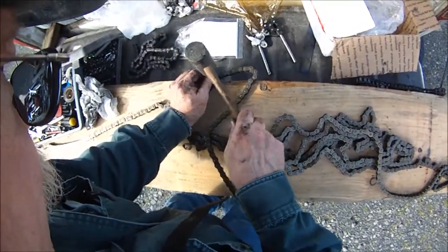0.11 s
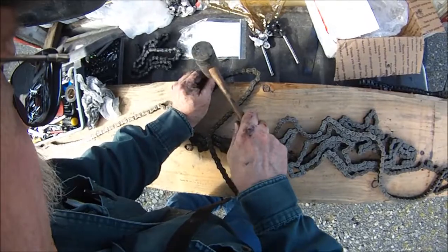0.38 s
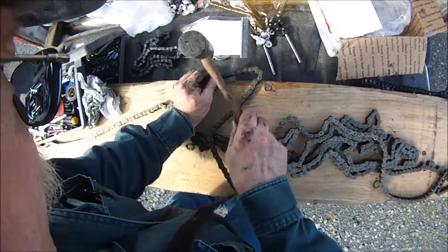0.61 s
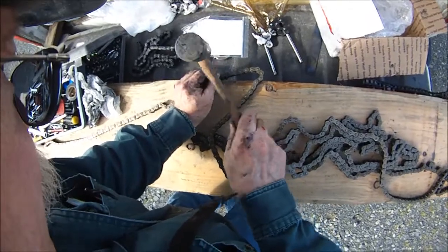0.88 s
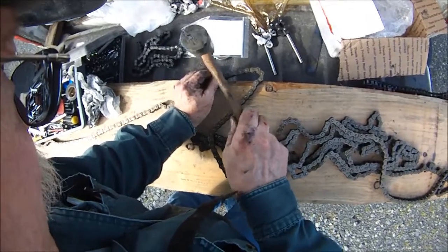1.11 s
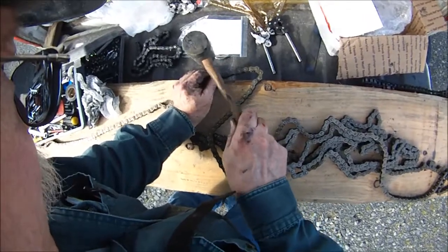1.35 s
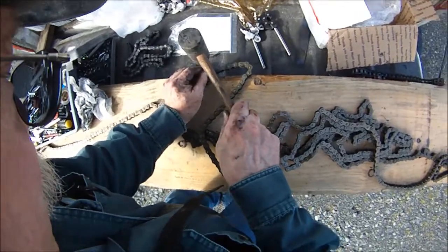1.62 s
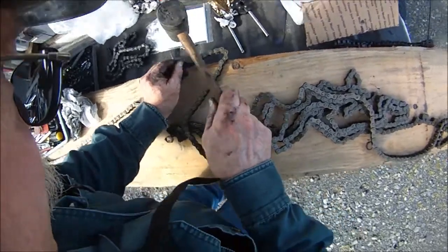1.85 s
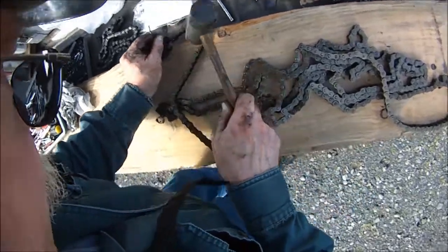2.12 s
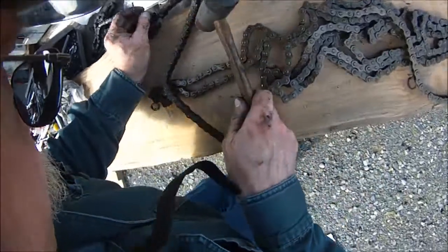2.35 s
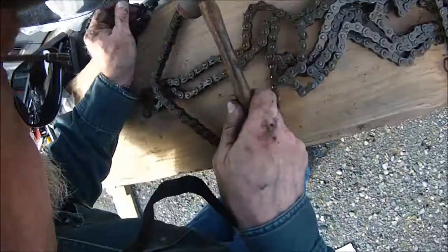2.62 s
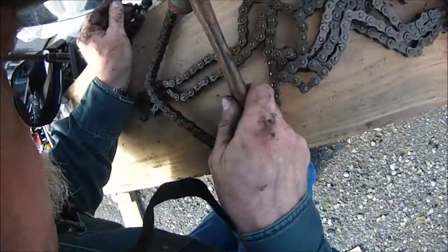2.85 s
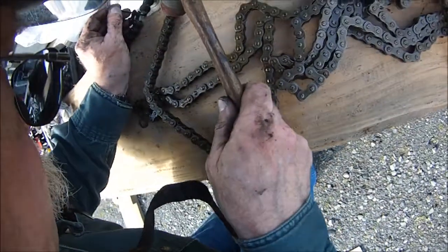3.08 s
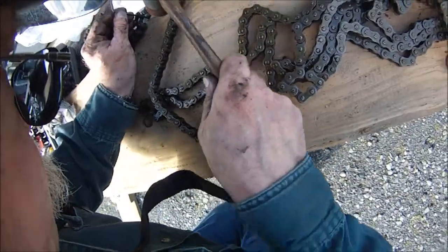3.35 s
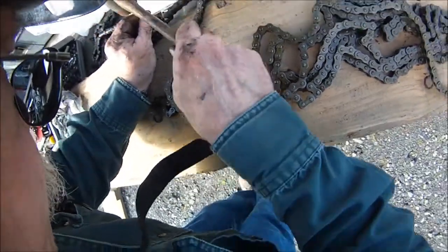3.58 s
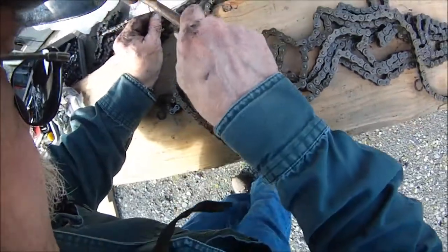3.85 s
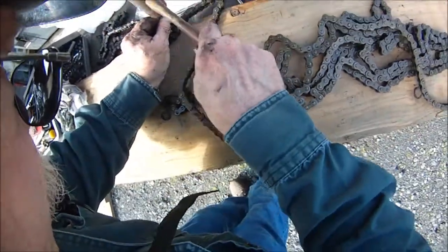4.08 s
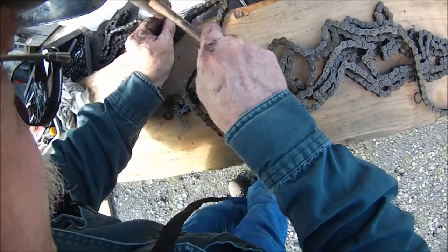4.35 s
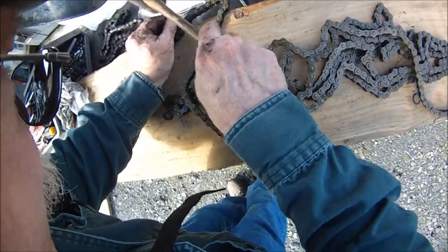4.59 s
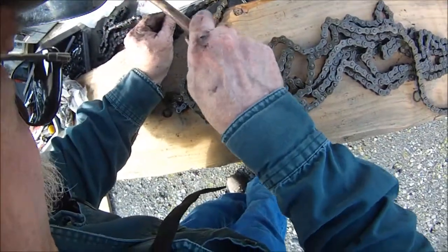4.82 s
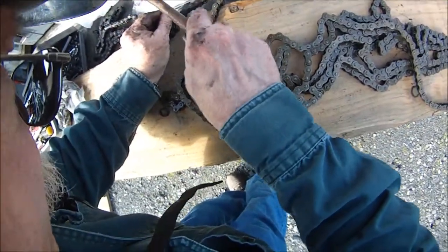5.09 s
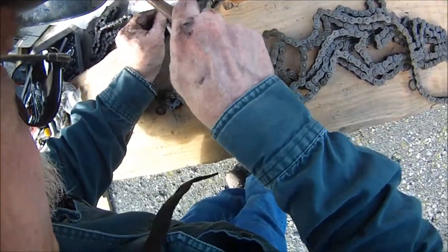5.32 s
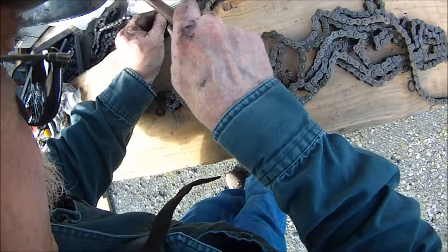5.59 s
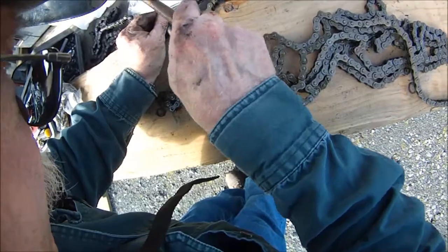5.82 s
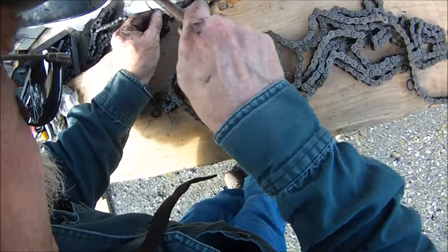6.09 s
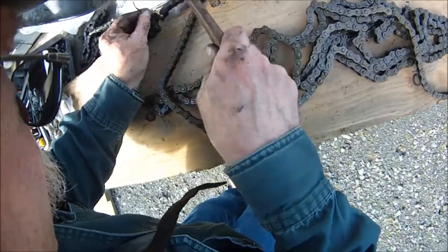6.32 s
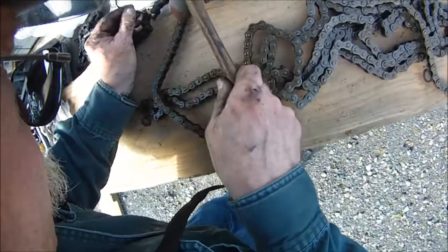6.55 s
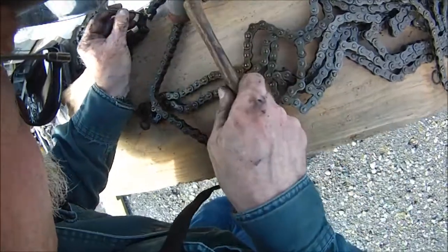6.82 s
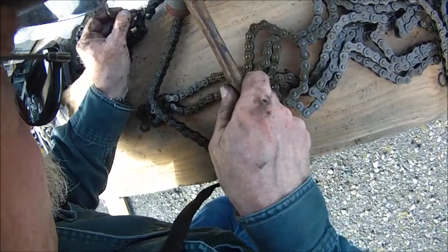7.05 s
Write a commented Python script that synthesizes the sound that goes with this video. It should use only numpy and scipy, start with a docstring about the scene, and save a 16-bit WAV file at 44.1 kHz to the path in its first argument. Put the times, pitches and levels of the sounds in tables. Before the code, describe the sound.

Close, dry hammer blows on a punch and chain link resting on a wooden plank, about four per second. Each is a hard woody knock with a steel tick, chattering rebounds, chain rattle and a short hollow boom from the metal bed below. After the first run, hands quietly shift the chain with soft bumps; then a second, slightly lighter and crisper run. Faint outdoor air and hiss remain.

```python
"""Outdoors, a small hammer taps a punch into a chain link lying on a wooden plank over a steel load bed.
Two quick runs of blows are heard. Each blow excites the damped modes of the plank, a steel tick and crack,
chain rattle and a wash of decaying noise bands from the bed; loose chain and tools hop and land as thuds,
clinks and thin ringing modes. Between the runs hands shift things: soft knocks and lumpy band noise.
A faint drifting tone and coloured noise supply the hum and the hiss."""
import sys
import numpy as np
from scipy import signal
from scipy.fft import rfft, irfft, next_fast_len
from scipy.io import wavfile
from scipy.ndimage import uniform_filter1d

SR = 44100
rng = np.random.default_rng(int(sys.argv[2]) if len(sys.argv) > 2 else 0)


def ratio_of_db(decibels):
    """Turn decibels (scalar or array-like) into linear amplitude factors; 0 dB maps to 1."""
    return 10 ** (np.asarray(decibels, float) / 20)


def store_pcm(level_fs):
    """Save levels as 16-bit WAV."""
    pcm = np.round(np.clip(level_fs, -1, 1) * 32767).astype(np.int16)
    wavfile.write(sys.argv[1], SR, np.atleast_2d(pcm).T)


N = 317079  # length in samples
LEAD = SR // 4  # samples ahead of the start, for a blow that fell just before it

# Modes of the plank. Each row: frequency in Hz, t60 in seconds before extra damping,
# relative signed swing when struck at spot 0, the same at spot 1.
PLANK = [(86.8, 0.7, 0.017, 0.008), (126.4, 0.29, 0.076, 0.018), (164.2, 0.39, 0.0266, 0.0394),
         (187.4, 0.44, 0.011, 0.012), (220, 0.029, -0.083, -0.27), (273.5, 0.32, -0.014, -0.068),
         (290.5, 0.23, -0.054, -0.027), (337.1, 0.111, 0.38, -0.24), (373.5, 0.043, -1.0, -0.196),
         (454.5, 0.16, -0.12, -0.131), (499.5, 0.14, 0.15, 0.17), (541, 0.049, -0.113, 0.58),
         (578.5, 0.068, 0.47, -0.35), (677, 0.055, 0.51, 0.66617), (734, 0.025, -0.6, -0.865),
         (818.7, 0.055, -0.102, 0.143), (946, 0.026, 0.493, 0.51), (1046.1, 0.062, -0.014, -0.13),
         (1200, 0.06, -0.093, -0.15), (1400, 0.058, -0.17892, -0.38), (1531.1, 0.21, 0.012, -0.014),
         (1740, 0.028, 0.025, 0.014), (1920, 0.083, -0.005, 0.022), (2114, 0.037, 0.057, 0.038),
         (2310, 0.021, -0.046, -0.061)]


def evened(x):
    """Normalization: scales a signal to rms 1."""
    return x / np.sqrt(np.mean(x ** 2) + 1e-20)


def add(mix, s, sound):
    """Superposition: adds a sound at s seconds to a mix that starts LEAD samples early."""
    part = mix[LEAD + round(s * SR):][:len(sound)]
    part += sound[:len(part)]


def ring(hz, db, t60, seconds):
    """Free vibration of one damped mode: a sine that decays by 60 dB in t60 seconds."""
    t = np.arange(round(seconds * SR)) / SR
    return ratio_of_db(db - 60 * t / t60) * np.sin(2 * np.pi * hz * t)


def push(x, soft_ms):
    """Contact duration: a bell-shaped force, centred 100 samples late; a softer contact is duller."""
    t_ms = np.arange(-100, 101) / SR * 1000
    force = np.exp(-(np.pi * t_ms / max(soft_ms, .05)) ** 2)
    return signal.fftconvolve(x, force / force.sum())


def band(x, hz, octaves):
    """Resonant filtering: a causal band-pass around hz."""
    edges = np.clip(hz * 2 ** (np.array([-.5, .5]) * octaves), 10, SR * .45)
    return signal.sosfilt(signal.butter(2, edges, "bandpass", fs=SR, output="sos"), x)


def blows():
    """Impact excitation: each blow drives plank, steel contact, chain and bed in proportion to its force."""
    # Each row: start in seconds, force in dB, softness of the contact in ms, first rebound in dB
    # relative to the blow, delay of the second rebound in ms, its level in dB relative to the blow.
    # The first blow fell just before the start.
    blow_rows = [(-0.12, -3, 0.6, -6, 10, -10), (0.1516, -4.5, 0.56, -13, 10.3, -5.5),
                 (0.4239, -4, 0.7, -6.1, 10, -11.8), (0.7, -2.5, 0.78, -3.8, 14.8, -13.6),
                 (0.99, -1.5, 0.7, -3.6, 13, -11.6), (1.2703, -2, 0.65, -0.7, 7.6, -7.9),
                 (1.5412, -3, 0.57, 1.5, 7.7, -9.7), (4.1025, -8, 0.93, -6.3, 13.8, -12.3),
                 (4.3773, -5, 0.88, -6.4, 9.2, -19.7), (4.6395, -5, 0.53, -12, 8.3, -9.3),
                 (4.8993, -4.5, 0.48, -22, 8, -7.5), (5.1575, -8, 0.34, -15.8, 8.2, -8.5),
                 (5.4278, -8, 0.2, -22, 8, -7.5), (5.7032, -7, 0.33, -13.4, 8.1, -7.8),
                 (5.972, -6, 0.15, -11.3, 8.2, -6.6)]
    moved_s = 3  # the link is moved from spot 0 to spot 1 of the plank
    first_rebound_ms = 4.0
    mix, t = np.zeros(N + LEAD), np.arange(SR // 2) / SR
    spots = [plank(swings, 0.81, 0.46) for swings in np.array(PLANK)[:, 2:].T]
    for s, force_db, soft_ms, rebound_db, second_ms, second_db in blow_rows:
        spot = int(s > moved_s)
        force = ratio_of_db(force_db)
        knock = push(spots[spot], soft_ms)
        # the punch chatters back onto the link twice
        for ms, db in [(0, 0), (first_rebound_ms, rebound_db), (second_ms, second_db)]:
            add(mix, s + ms / 1000 - 100 / SR, ratio_of_db(force_db + db) * knock)
        contact_noise = rng.standard_normal(len(t))
        add(mix, s - .0006, force * tick(contact_noise, t, spot, soft_ms))
        add(mix, s, force * crack(contact_noise, t, spot, soft_ms))
        add(mix, s, force * rattle(t, spot))
        # the bed feels the blow through the plank, so a soft blow dulls it too
        add(mix, s - 100 / SR, force * push(bed(t, spot), .4 * soft_ms))
    return mix


def plank(swings, damping, seconds):
    """Modal superposition on a damped plank; a narrow board radiates little deep bass."""
    modes = sum(swing * ring(hz, 0, damping * t60, seconds)
                for swing, (hz, t60, *_) in zip(swings, PLANK))
    return signal.sosfilt(signal.butter(3, 90, "highpass", fs=SR, output="sos"), modes)


def tick(noise, t, spot, soft_ms):
    """Short steel contact: a brief high noise burst that weakens as the contact softens."""
    level_db = (-31.5, -40)[spot] - 9 * soft_ms
    envelope = (1 - np.exp(-t / .0004)) * np.exp(-t / .0022)
    return ratio_of_db(level_db) * evened(band(noise, 5000, 2.2)) * envelope


def crack(noise, t, spot, soft_ms):
    """Transmission into the wood under the link: a burst near 2 kHz, stronger when the contact is hard."""
    level_db = (-22, -18.5)[spot] - 18 * soft_ms
    envelope = (1 - np.exp(-t / 0.0014)) * np.exp(-t / 0.005)
    return ratio_of_db(level_db) * evened(band(band(noise, 2050, 1.1), 2050, 1.1)) * envelope


def rattle(t, spot):
    """Random impact train: links chatter in many tiny knocks, partly ringing and partly dry."""
    level_db = (-54.5, -58)[spot]
    strengths = ratio_of_db(3.5 * np.minimum(rng.exponential(1, len(t)), 4)) * rng.standard_normal(len(t))
    knocks = strengths * (rng.random(len(t)) < 4500 / SR)  # about 4500 knocks a second
    ringing = signal.fftconvolve(knocks, clink())[:len(t)]
    chatter = .4 * evened(ringing) + .9 * evened(band(knocks, 5600, 1.9))
    # the chain is flung up, slaps down all at once, then settles
    slap = 1.2 * np.exp(-((t - .015) / .002) ** 2)
    settle = np.exp(-t / 0.061) / (1 + np.exp((t - .066) / 0.0045))
    return ratio_of_db(level_db) * chatter * (slap + settle)


def clink():
    """Modal ringing of link on link: modes a little detuned and unevenly struck; peak 1."""
    # Each row: frequency in Hz before detuning, relative level in dB before the uneven strike, t60 in seconds.
    links = [(4200, -9, 0.0084), (5000, -11, .008), (5900, -6, .01), (6800, -2, .02), (7419.7, -1.5, .025),
             (9128, -7, .012), (10500, -10, .01), (12800, -12, .008)]
    modes = [ring(hz * (1 + .06 * (detune - .5)), db + 12 * strike, t60, .03)
             for (hz, db, t60), (detune, strike) in zip(links, rng.random((len(links), 2)))]
    sound = sum(modes)
    return sound / abs(sound).max()


def bed(t, spot):
    """High modal density: the steel bed and its load ring as noise bands, each with its own decay; one short
    band near 2.2 kHz is a brief crack of the wood."""
    # Each row: centre in Hz, level in dB relative to the force at spot 0, the same at spot 1, t60 in seconds.
    bed_bands = [(48.6, -48, -45, 1), (85, -41, -39.5, 1), (157, -25.5, -27, 0.38), (203, -26, -24, 0.32),
                 (313, -23.5, -21.5, 0.28), (450, -22, -18.5, 0.17), (756, -18, -25.5, 0.14),
                 (1105.6, -31, -27.5, 0.135), (1530, -29.5, -37.5, 0.098), (2250, -37.5, -30, 0.012),
                 (2320, -42.5, -46.5, 0.115), (3621, -54.5, -52, 0.16)]
    noise = rng.standard_normal(len(t))
    wash = np.zeros(len(t))
    for hz, *levels_db, t60 in bed_bands:
        onset = 1 - np.exp(-t * hz / 5)  # low bands build up more slowly
        wash += evened(band(noise, hz, 0.66)) * ratio_of_db(levels_db[spot] - 60 * t / t60) * onset
    return wash


def landings():
    """Secondary impacts: the load thrown up by a blow thuds back, a straggler follows, some links clink."""
    # Chain and tools falling back on the plank. Each row: time in seconds, peak of the thud in dB.
    landing_rows = [(0.184, -23), (0.458, -24), (0.737, -22.5), (1.027, -19.5), (1.304, -23.5),
                    (1.316, -22), (1.581, -28.5), (4.129, -20.5), (4.411, -25.5), (4.676, -21),
                    (4.933, -25), (5.186, -21.5), (5.456, -16), (5.736, -18), (6.003, -22)]
    # Links that clink clearly as they land. Each row: start in seconds, peak in dB.
    clink_rows = [(0.737, -44), (0.746, -47), (1.013, -54), (1.027, -49), (1.316, -49), (1.556, -50),
                  (1.570, -47), (1.578, -51), (4.143, -54), (4.411, -44.5), (4.676, -48), (4.933, -49),
                  (5.456, -42.5), (5.736, -55)]
    mix = np.zeros(N + LEAD)
    for s, db in landing_rows:
        lag, spread = rng.uniform(-1, 1, 2)
        add(mix, s - .008, ratio_of_db(db) * thud(1.1, .004, .8))
        # a lighter piece lands about 16 ms later, about 9 dB weaker
        straggler_s = s - .008 + .016 * (1 + .3 * lag)
        add(mix, straggler_s, ratio_of_db(db - 9 + 3 * spread) * thud(1.1, .004, .8))
    for s, db in clink_rows:
        add(mix, s, ratio_of_db(db) * clink())
    return mix


def thud(softness_ms, spread_s, damping):
    """Distributed impact: a loose thing meets the plank at a chance spot, link after link; peak 1."""
    swings = rng.uniform(-1.1, 1, len(PLANK)) * abs(np.array(PLANK)[:, 2:]).mean(1)
    u = np.arange(1200) / SR / spread_s
    patter = rng.standard_normal(len(u)) * u * np.exp(-u)
    sound = push(signal.fftconvolve(plank(swings, damping, .16), patter), softness_ms)
    return sound / abs(sound).max()


def tool():
    """Lightly damped steel: two thin modes of a loose tool that start late, when it touches down."""
    # The modes of the tool. Each row: frequency in Hz, t60 in seconds.
    tool_modes = [(3607, 0.17), (9614, 0.22)]
    # Each row: start in seconds, level of the low mode in dB, of the high mode in dB, before the fade-in.
    tool_rings = [(.208, -62, -66), (1.038, -61, -64), (1.315, -62, -73), (1.606, -63, -71),
                  (4.42, -61, -70), (4.68, -61, -80), (4.945, -59.5, -90), (5.23, -72, -90),
                  (5.75, -68, -86), (6.022, -64.5, -76)]
    mix = np.zeros(N + LEAD)
    fade_in = np.minimum(np.arange(round(.2 * SR)) / (.003 * SR), 1)
    for s, *levels_db in tool_rings:
        for (hz, t60), db in zip(tool_modes, levels_db):
            add(mix, s, ring(hz, db, t60, .2) * fade_in)
    return mix


def bumps():
    """Soft impact: hands shift the chain and bump the plank, a low resonance and a dry tap."""
    # Each row: start in seconds, level of the knock in dB before its soft onset,
    # frequency of the knock in Hz, peak of the tap in dB.
    bump_rows = [(1.928, -51, 266.4, -56), (2.262, -49.5, 412, -54), (2.461, -55, 227.3, -55.5),
                 (2.78, -53, 90, -70), (2.827, -52, 292, -56), (2.951, -51.5, 224.2, -59),
                 (3.183, -51.5, 286, -57), (3.309, -55.5, 81.3, -64), (3.83, -42.5, 75, -57),
                 (6.479, -59, 67.3, -69)]
    mix, t = np.zeros(N + LEAD), np.arange(SR // 8) / SR
    for s, db, hz, tap_db in bump_rows:
        add(mix, s, ring(hz, db, .11, len(t) / SR) * (1 - np.exp(-t / .008)))
        add(mix, s + .003, ratio_of_db(tap_db) * thud(0.74, 0.002923, 0.37))
    return mix


def shuffle():
    """Friction noise: hands and chain scrape on wood, lumpy noise in the middle modes of the plank."""
    # Each row: time in seconds, level in dB; straight lines join the rows.
    shuffle_levels = [(1.8, -72), (2.15, -78), (2.3, -68), (3.15, -70), (3.4, -77), (3.85, -70), (4.1, -76),
                      (6.2, -73), (6.5, -78), (7.19, -83)]
    lumps_db = 3 * evened(uniform_filter1d(rng.standard_normal(N), 1000))
    level_db = np.interp(np.arange(N) / SR, *np.transpose(shuffle_levels))
    scrape = band(rng.standard_normal(N), 330, 1.5) * ratio_of_db(lumps_db)
    return evened(scrape) * ratio_of_db(level_db)


def hum():
    """Frequency and amplitude modulation: a distant motor's tone drifts slightly, swells and drops out."""
    # Each row: centre in seconds, half length in seconds, change of level in dB.
    wavers = [(1.95, .17, 6), (2.33, .12, -20), (3.03, .09, -20), (3.8, .2, -5), (6.87, .1, -20)]
    hum_hz, hum_db = 137.38, -68.5
    t = np.arange(N) / SR
    drift = 1 + .006 * evened(uniform_filter1d(rng.standard_normal(N), 9000))
    wavers_db = sum(db * np.exp(-((t - s) / half_s) ** 2) for s, half_s, db in wavers)
    tone = np.sqrt(2) * np.sin(2 * np.pi * np.cumsum(hum_hz * drift) / SR)
    return tone * ratio_of_db(hum_db + wavers_db)


def air():
    """Spectral shaping of white noise: outdoor air and microphone hiss, sinking slowly."""
    # Each row: frequency in Hz, relative level in dB per Hz.
    air_colour = [(15, -32.5), (30, -15.5), (70, -11.5), (130, -16.5), (230, -17), (400, -23.5), (800, -29),
                  (2000, -32), (14300, -41), (15500, -53)]
    f, db = np.transpose(air_colour)
    size = next_fast_len(N)
    hz = np.fft.rfftfreq(size, 1 / SR)
    colour = ratio_of_db(np.interp(np.log(hz + 1), np.log(f + 1), db))
    noise = irfft(rfft(rng.standard_normal(size)) * colour, size)[:N]
    return ratio_of_db(-63.5 - .6 * np.arange(N) / SR) * evened(noise)  # sinks 0.6 dB a second


def scene():
    """Linear superposition of all sources at one microphone."""
    near = blows() + landings() + tool() + bumps()
    return (near[LEAD:] + shuffle() + hum() + air())[None]


def band_limit(x):
    """A steep low-pass at the top of the band."""
    return signal.sosfilt(signal.butter(12, 15920, fs=SR, output="sos"), x)


def record(dry):
    """Saturation and band limiting: the loudest peaks are rounded off, the top is cut at 15.9 kHz."""
    rounded = .9 * np.tanh(dry / .9)
    limited = signal.oaconvolve(rounded, signal.firwin(255, 15900, fs=SR)[None], "same")
    return band_limit(limited)


dry = scene()
out = record(dry)
store_pcm(out)
```